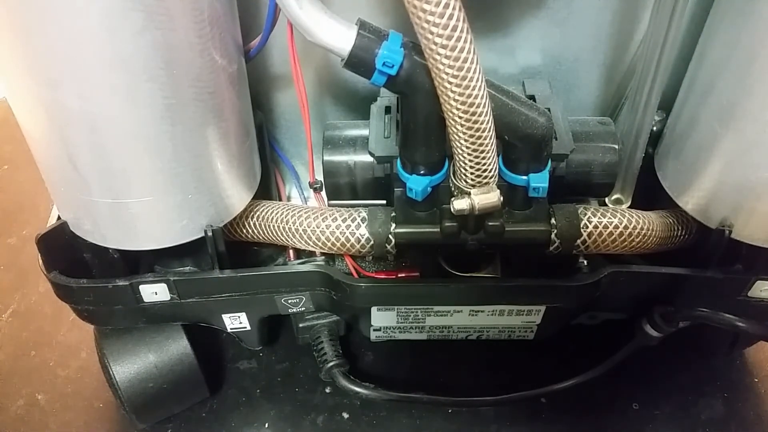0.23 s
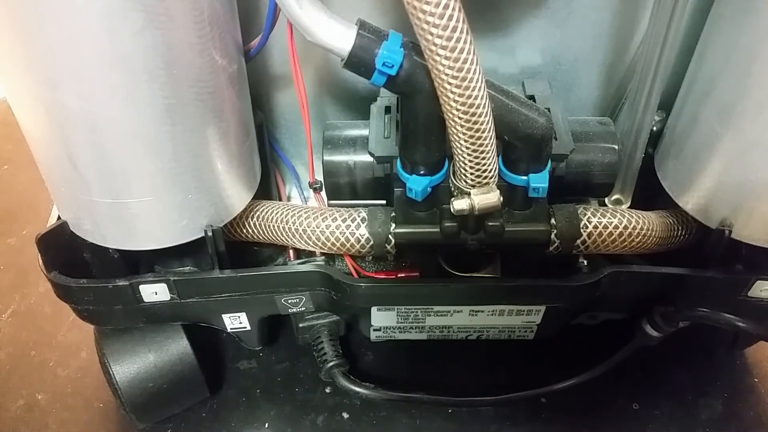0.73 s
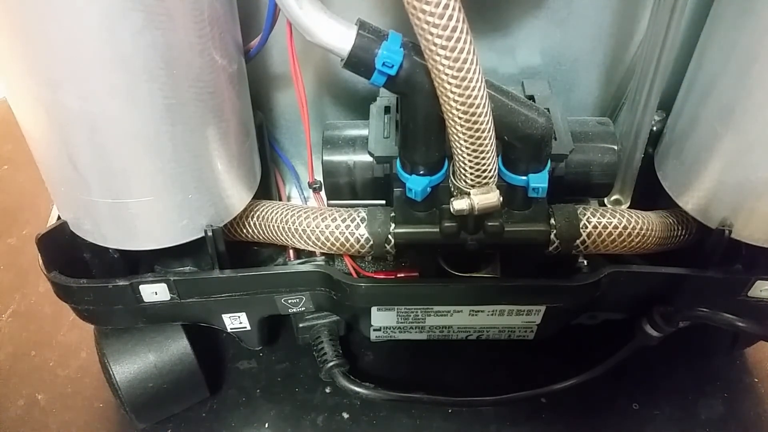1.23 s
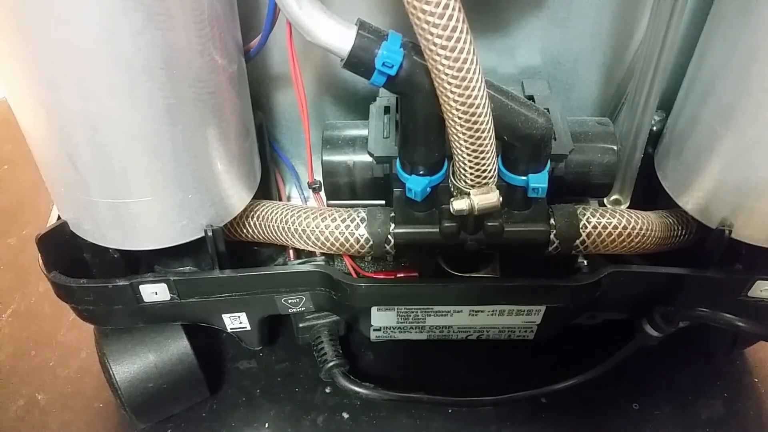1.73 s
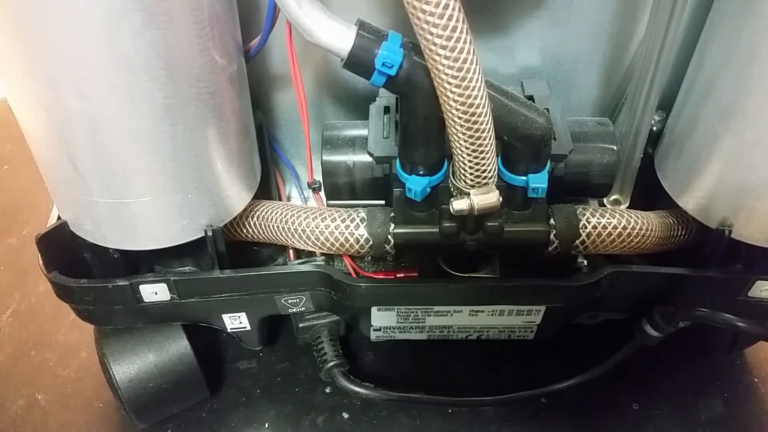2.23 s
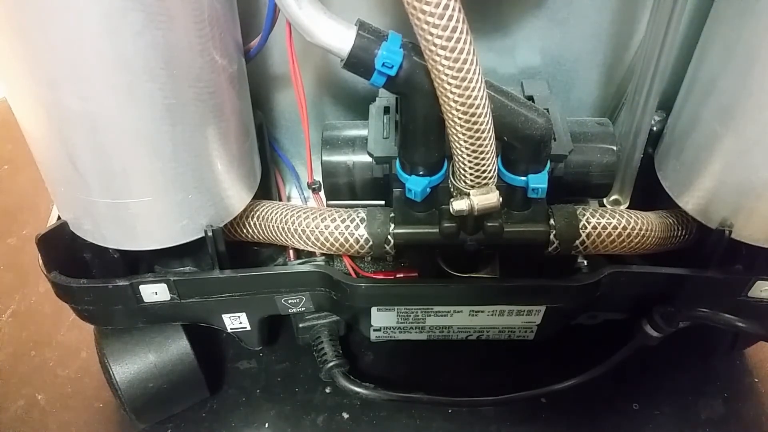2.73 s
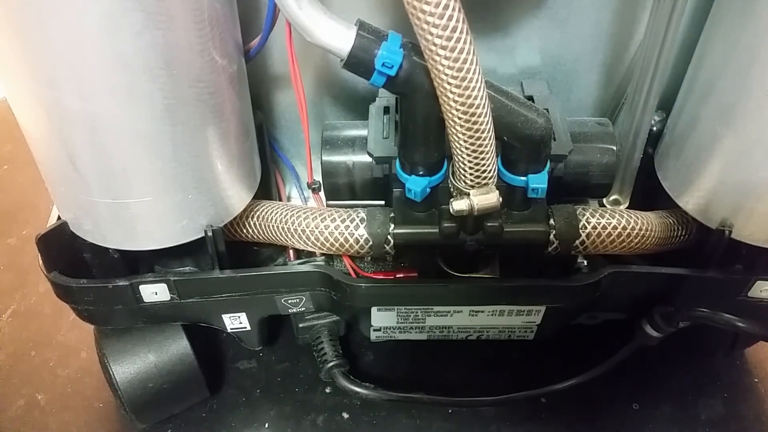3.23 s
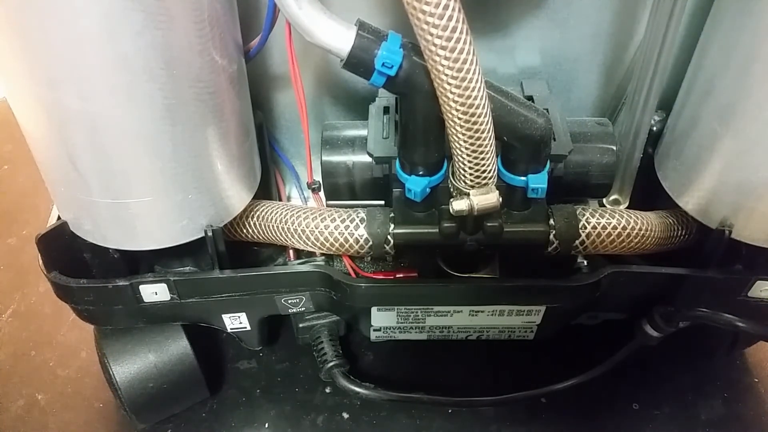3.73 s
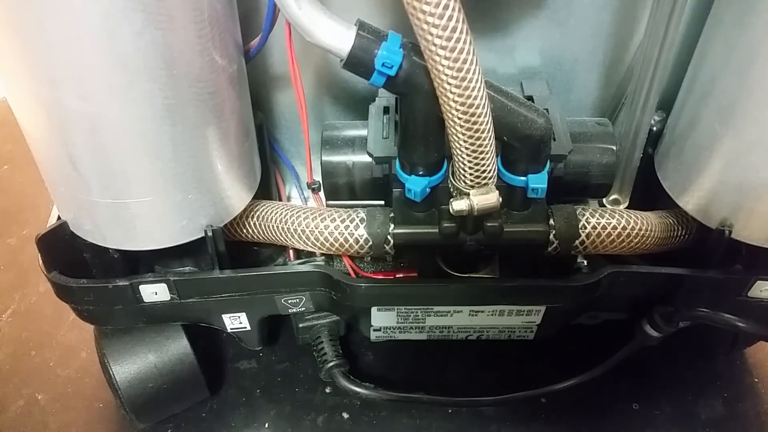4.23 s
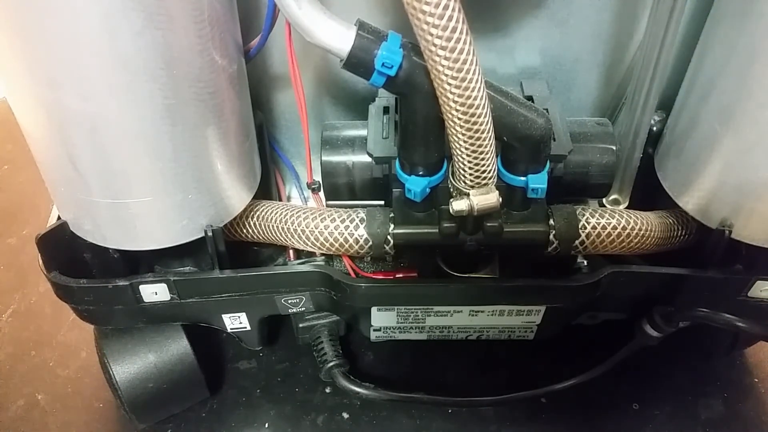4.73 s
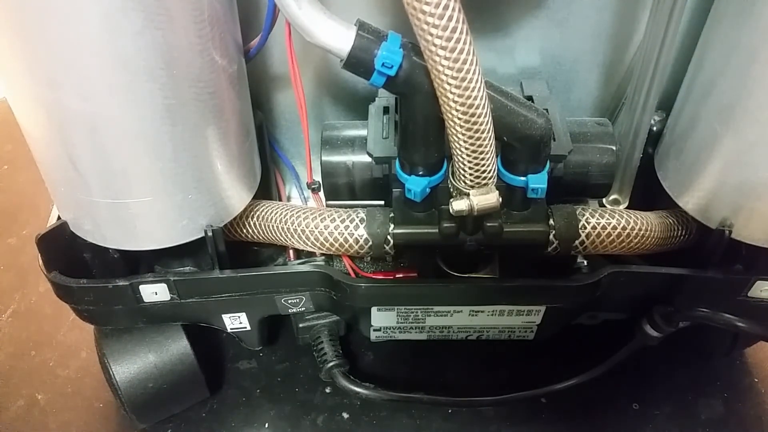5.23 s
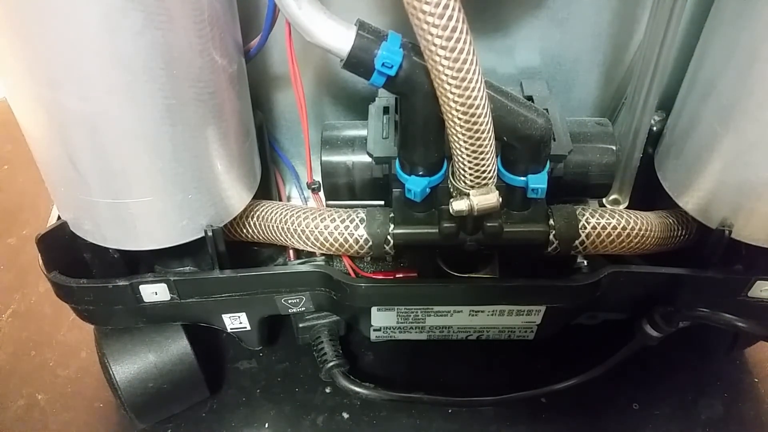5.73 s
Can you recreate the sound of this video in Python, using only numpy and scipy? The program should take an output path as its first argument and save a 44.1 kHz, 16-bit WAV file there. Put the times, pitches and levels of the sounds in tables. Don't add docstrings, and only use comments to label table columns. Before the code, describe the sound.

Phone stereo microphone held near an air pump in an open plastic case. Rapid pulses, about forty-eight a second, blur into a rough hum with thin whistles and hiss. Early on, a click releases bright air, a knock and thud switch valves, and pressure vents while fading over seconds. The pump slowly slows. A small relay tick falls mid-way; a piercing tick and tiny puff close the stretch.

```python
import sys
import numpy as np
from scipy import signal
from scipy.fft import rfft, irfft
from scipy.io import wavfile
from scipy.ndimage import uniform_filter1d

SR = 44100
rng = np.random.default_rng(int(sys.argv[2]) if len(sys.argv) > 2 else 0)


def store_pcm(level_fs):
    pcm = np.round(np.clip(level_fs, -1, 1) * 32767).astype(np.int16)
    wavfile.write(sys.argv[1], SR, np.atleast_2d(pcm).T)


def ratio(d):
    e = np.asarray(d, float) / 20
    return 10 ** e


N = 263718
T = np.arange(N) / SR
HZ = np.fft.rfftfreq(N, 1 / SR) + 1
SIDES = np.array([[1], [-1]])

# (frequency [Hz], left minus right [dB])
PAN = [(60, -2.5), (110, -2.0), (200, -1.0), (380, 2), (700, -1.5), (1290, -0.5), (2380, 1), (4400, -6),
       (8120, 3), (15000, -3.5)]


def over_hz(table, hz=HZ):
    table_hz, value = np.transpose(table)
    return np.interp(np.log(hz), np.log(np.maximum(table_hz, 1)), value)


def humps(peaks):
    return sum(ratio(2 * db) / (1 + ((HZ - hz) / (width_hz / 2)) ** 2) for hz, width_hz, db in peaks)


def hiss(power):
    # (frequency [Hz], correlation [0-1])
    likeness = [(100, 0.7), (300, 0.83), (700, 0.82), (1400, 0.34), (2800, 0), (6000, 0), (13000, 0.14)]
    port_lag_s = 4 / SR
    like = np.clip(over_hz(likeness), 0, 1)
    mid, side = rfft(rng.standard_normal((2, N)))
    balance = ratio(SIDES * over_hz(PAN) / 2)
    delay = np.exp(1j * np.pi * HZ * port_lag_s * SIDES)
    stereo = np.sqrt(1 + like) * mid + SIDES * np.sqrt(1 - like) * side
    noise = irfft(stereo * balance * delay * np.sqrt(power), N)
    return noise / np.sqrt(np.mean(noise ** 2))


def walk(rate):
    held = int(SR / rate)
    steps = np.repeat(rng.standard_normal(N // held + 1), held)
    return 1.1 * uniform_filter1d(uniform_filter1d(steps, held), held)[:N]


def fan(empty):
    hz = 423.3 + 2.483 * empty + 0.58 * walk(10.18)
    level_db = -46.5 + 1.5 * empty + 1.45 * walk(28)
    phase = 2 * np.pi * np.cumsum(hz) / SR + 0.085 * SIDES
    return np.sqrt(2) * ratio(level_db) * np.sin(phase)


def air(turn, empty):
    # (frequency [Hz], level [dB per Hz])
    flow = [(30, -31.5), (193, -16.5), (369, -26), (500, -21), (935, -27), (1280, -27.5), (1570, -33),
            (2640, -30.5), (3880, -35), (4650, -27.5), (6180, -32), (9500, -33.5), (13000, -32),
            (16000, -36.5)]
    # (frequency [Hz], width [Hz], level [dB])
    fittings = [(1815, 84, -2), (2350, 20, -1.5), (2945, 170, -5), (3290, 130, 0.5), (4592, 42, 1.5),
                (6940, 270, -8), (8280, 250, -10), (11800, 660, -16)]
    # (frequency [Hz], width [Hz], full tank [dB], change when empty [dB], change after swap [dB])
    whistles = [(534, 68, -44.5, -6, -7), (719.7, 13, -54.5, -0.5, 0.5), (1137.4, 34, -54.5, 8.5, 1.5),
                (1279, 33, -57, -3, 9.5)]
    swapped = T > .82
    low_db = -40 + 1.6 * empty
    high_db = -37.5 - 1.06 * empty - 1.6 * swapped
    power = ratio(2 * over_hz(flow))
    dull = 1 / (1 + (HZ / 1500) ** 4)
    low = ratio(low_db + 0.99 * np.cos(2 * turn - 4.2) + 0.36 * walk(11)) * hiss(power * dull)
    high = ratio(-1.1 * np.cos(2 * turn - .3) + 0.26 * walk(8)) * hiss(power * (1 - dull))
    ring = ratio(-4.5 - 1.25 * np.cos(2 * turn) + 1.84 * walk(14)) * hiss(humps(fittings))
    song = []
    for hz, width_hz, full_db, empty_db, swap_db in whistles:
        level_db = full_db + empty_db * empty + swap_db * swapped
        level_db = level_db + 0.7 * walk(3.02) + 0.4 * walk(7.8)
        song.append(ratio(level_db) * hiss(humps([(hz, width_hz, 0)]) ** 2))
    stroke = ratio(2.0 * np.cos(turn - .8) + 0.78 * np.cos(2 * turn + .4))
    return low + ratio(high_db) * (high + ring) + song[0] + song[1] + stroke * (song[2] + song[3])


def solenoids():
    # (delay [ms], peak [dB], frequency [Hz], width [Hz], decay by 60 dB [s])
    inlet = [
        (0, -23, 11500, 5500, .03),
        (1.2, -31, 2150, 500, .04),
        (.2, -33, 1000, 500, .05),
    ]
    swap = [
        (0, -26, 7200, 1200, .05),
        (3, -26.5, 490, 40, .07),
        (3, -36, 690, 80, .05),
        (19.5, -25, 105, 8, .14),
    ]
    relay = [
        (1.8, -24.5, 3800, 500, .045),
        (9, -32, 3700, 900, .05),
        (1, -33, 2100, 500, .03),
        (0, -28, 3100, 500, .05),
    ]
    purge = [
        (.2, -6.5, 12400, 1900, .011),
        (1.4, -14, 12000, 1400, .008),
        (3.4, -15, 11900, 1200, .012),
        (.3, -25, 7900, 500, .025),
        (.3, -24, 8500, 10000, .012),
    ]
    # (time [s], rings, left minus right [dB])
    blows = [(.7048, inlet, 0), (.806, swap, 0), (2.42, relay, 0), (5.4408, purge, -1.5)]
    out, t = np.zeros((2, N)), T[:SR // 3]
    for blow_s, rings, pan_db in blows:
        for delay_ms, peak_db, hz, width_hz, t60, in rings:
            spread, phase, apart = rng.uniform(-1, 1, (3, 30, 1))
            scatter = min(hz / 2500, 1)
            start = scatter * (1.8 * phase + .9 * apart * SIDES[:, None])
            ring = np.sin(2 * np.pi * (hz + width_hz / 2 * spread) * t + start).sum(axis=1)
            ring *= np.exp(-np.log(1000) * t / t60) * np.minimum(t * hz / 3, 1)
            i = int((blow_s + delay_ms / 1000) * SR)
            out[:, i:i + len(t)] += ratio(peak_db + SIDES * pan_db / 2) * ring / np.abs(ring).max()
    return out


def rush(start, hold, peak_db, settle_db, fade_db):
    attack_s, settle_s = .0015, .03
    after = np.maximum(T - start - hold, 0)
    settling_db = settle_db * (1 - np.exp(-after / settle_s))
    return np.clip((T - start) / attack_s, 0, 1) * ratio(peak_db - settling_db - fade_db * after)


def valves():
    # (frequency [Hz], level [dB per Hz])
    jet_colour = [(1200, -51), (2000, 1), (2600, -9), (4500, -1.5), (6500, -2), (8700, -2), (11000, -1),
                  (12800, 4), (14600, -2), (16000, -15.5)]
    vent_colour = [(900, -21), (1600, -2.5), (3800, -2), (4600, 1.5), (5700, -5.5), (6900, -13), (9000, -2),
                   (11000, -4), (14600, -28), (16000, -26)]
    # (frequency [Hz], width [Hz], level [dB])
    jet_pipes = [(8850, 250, -7), (10900, 300, -3), (12400, 400, -2), (13300, 600, -3)]
    vent_pipes = [(6840, 290, 0.5), (7600, 370, -2), (8900, 200, -9), (12050, 300, -4), (14000, 500, -3.5)]
    puff_pipes = [(11950, 1200, 0.5), (7800, 510, -16)]
    seep_pipes = [(12000, 1800, -6), (13850, 450, -1.5), (9300, 3100, -5)]
    jet = hiss(ratio(2 * over_hz(jet_colour))) + ratio(-2.0) * hiss(humps(jet_pipes))
    jet = jet * ratio(0.8 * walk(61.6))
    jet = jet * rush(start=.7045, hold=.1, peak_db=-29.4, settle_db=11, fade_db=17)
    vent = hiss(ratio(2 * over_hz(vent_colour))) + ratio(1.0) * hiss(humps(vent_pipes))
    vent = vent * ratio(0.96 * walk(25.26))
    vent = vent * rush(start=.803, hold=.008, peak_db=-30, settle_db=5, fade_db=9)
    puff = ratio(1.5 * walk(300)) * hiss(humps(puff_pipes) ** 1.4)
    puff = puff * rush(start=5.441, hold=.014, peak_db=-30, settle_db=10, fade_db=150)
    seep = ratio(1.5 * walk(70)) * hiss(humps(seep_pipes) ** 1.3)
    seep = seep * rush(start=5.45, hold=.03, peak_db=-43.5, settle_db=1.5, fade_db=.8)
    return jet + vent + puff + seep


def pistons(turn, empty):
    # (multiple of shaft speed, level [dB])
    orders = [(1, -30), (2, -10.5), (3, -28.5), (4, -1.5), (5, -25), (6, -3.5), (7, -18.5), (8, -1.5),
              (9, -10.5), (10, -14), (11, -24), (12, -22), (13, -33), (14, -24), (19, -29), (21, -28),
              (27, -29)]
    throb_db = -32 - 1.3 * empty
    ring_db = -27.5 - 4 * empty - 2.5 * empty ** 8
    uneven_db = -36 - 5.5 * empty
    reed_lag, reed_phase = 2.13, 1.8
    ref, out = dict(orders), 0
    for k, db in orders[1:]:
        share = np.clip((k - 4) / 4, 0, 1) if k > 2 else 1
        even_db = (1 - share) * (throb_db - ref[4]) + share * (ring_db - ref[8])
        level_db = db + (uneven_db - ref[9] if k % 2 else even_db) + 0.041 * k * walk(14)
        if k >= 12:
            lag = k * reed_lag - reed_phase
        else:
            lag = .45 * np.tanh((k - 8.4) / 1.2) * (k > 4) + np.pi * (k in (3, 5))
        ports = ratio(SIDES * over_hz(PAN, 24 * k) / 2)
        wave = np.cos(k * turn - lag + 0.05 * k * walk(12) + .09 * SIDES)
        out = out + np.sqrt(2) * ratio(level_db) * ports * wave
    return out


def scene():
    # (time [s], speed [turns/s])
    shaft = [
        (0, 23.655),
        (.82, 23.73),
        (.85, 25.3),
        (.9, 24.309),
        (1.05, 24.273),
        (1.5, 24.168),
        (2.4, 24.066),
        (5.3, 23.785),
        (5.98, 23.809),
    ]
    speed_s, speed_hz = np.transpose(shaft)
    speed = np.interp(T, speed_s, speed_hz)
    loaded_hz, free_hz = 23.7, 24.33
    lagging = np.interp(T - .014, T, speed)
    empty = np.clip((lagging - loaded_hz) / (free_hz - loaded_hz), 0, 1)
    turn = 2 * np.pi * (.358 + np.cumsum(speed) / SR)
    return fan(empty) + air(turn, empty) + solenoids() + valves() + pistons(turn, empty)


def band_limit(x):
    return signal.sosfilt(signal.butter(12, 15800, fs=SR, output="sos"), x)


def record(dry):
    duck = ratio(-4 * np.exp(-((T - 5.43) / 0.0066) ** 2))
    top_hz, slope_hz = 14690, 200
    top_cut = np.clip((top_hz - HZ) / slope_hz, 0, 1)
    mix = irfft(rfft(dry * duck) * top_cut, N)
    return band_limit(mix)


dry = scene()
out = record(dry)
store_pcm(out)
```